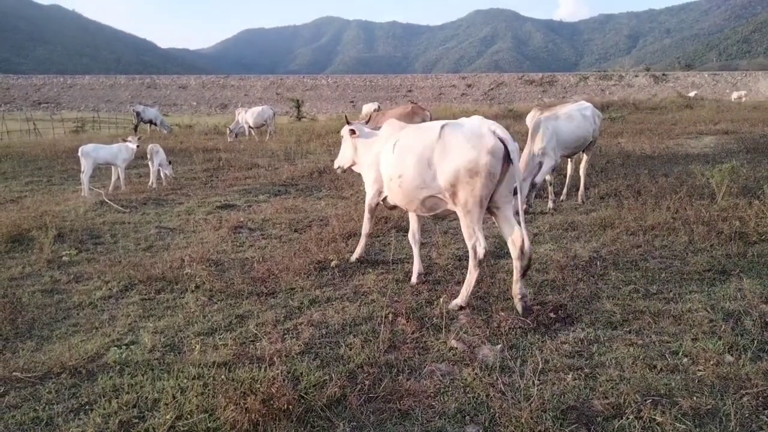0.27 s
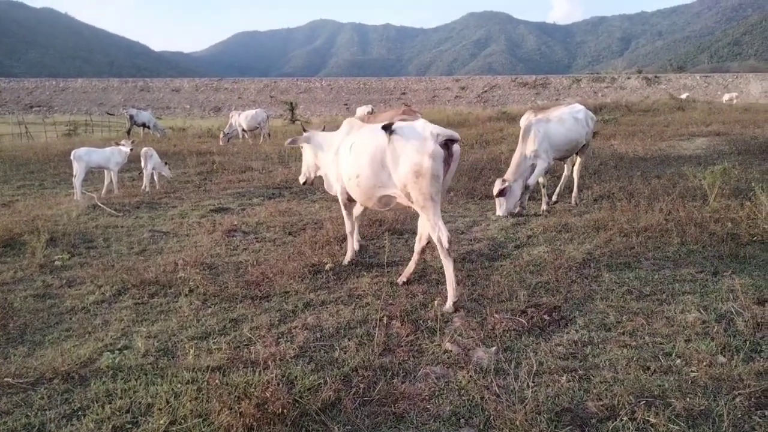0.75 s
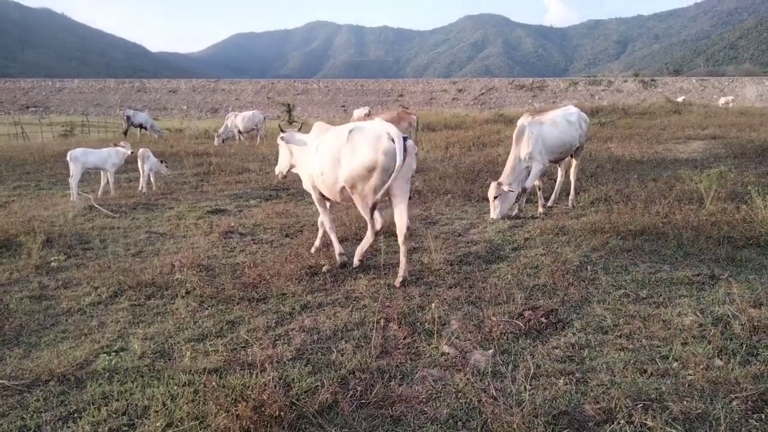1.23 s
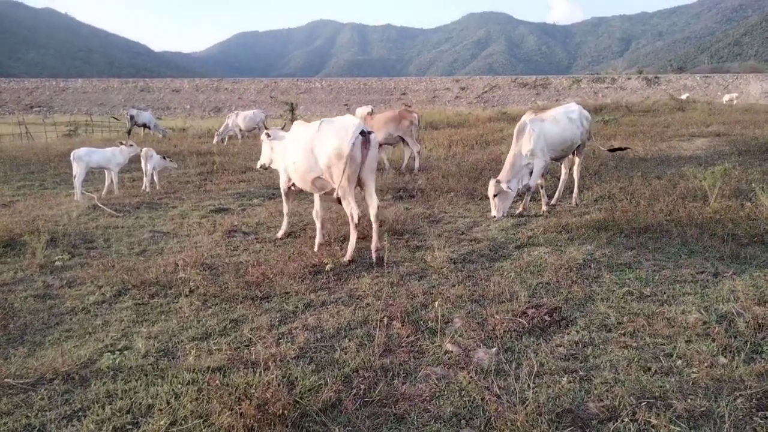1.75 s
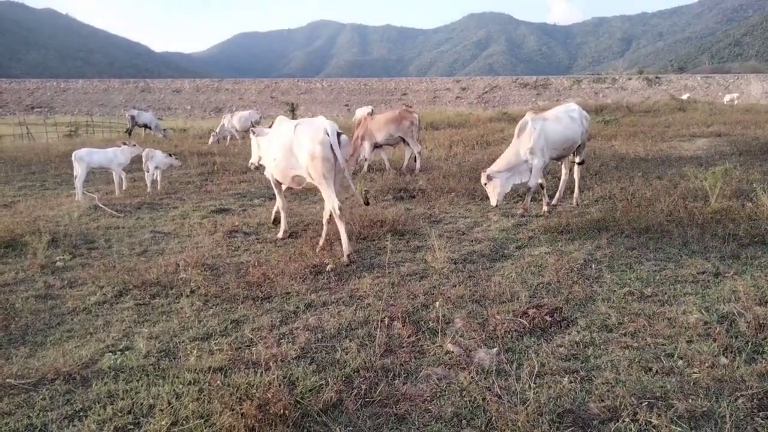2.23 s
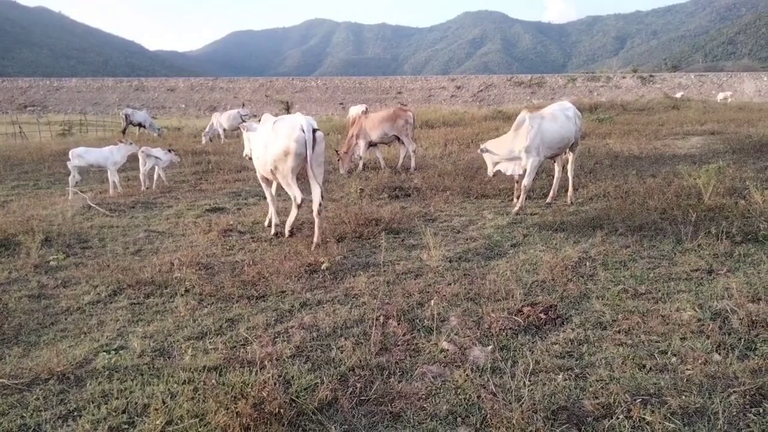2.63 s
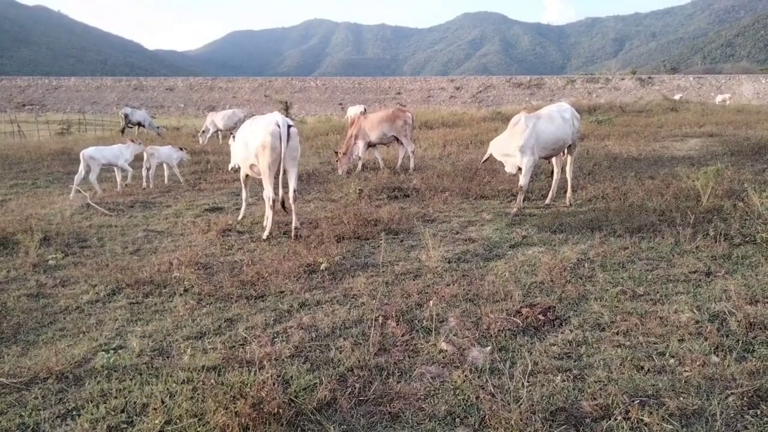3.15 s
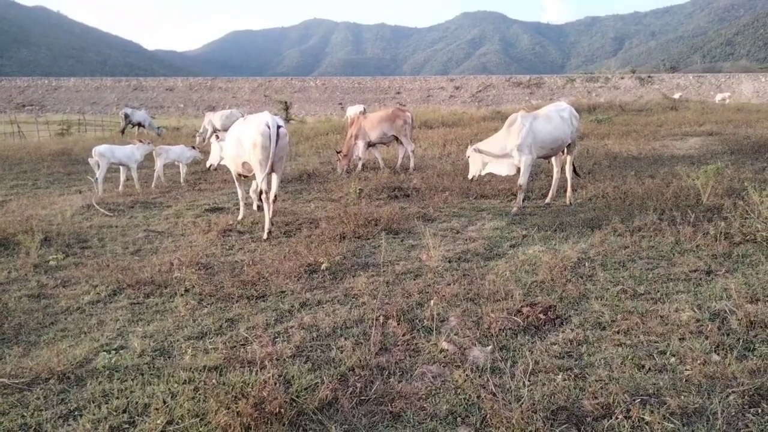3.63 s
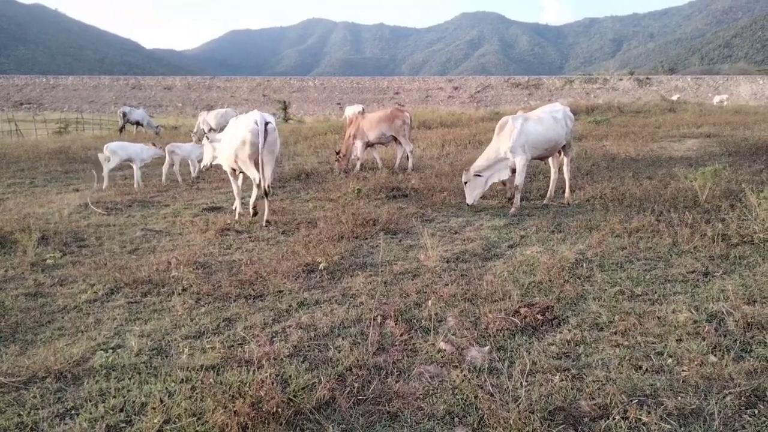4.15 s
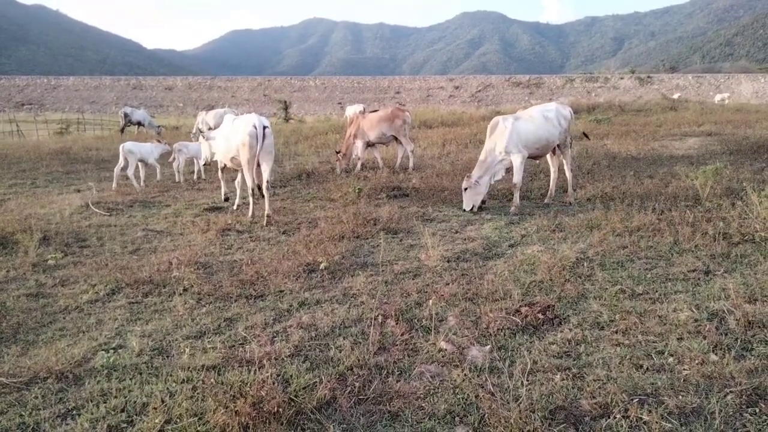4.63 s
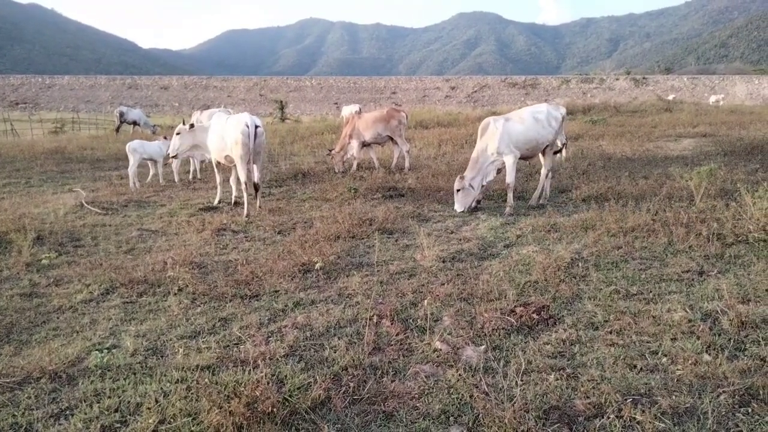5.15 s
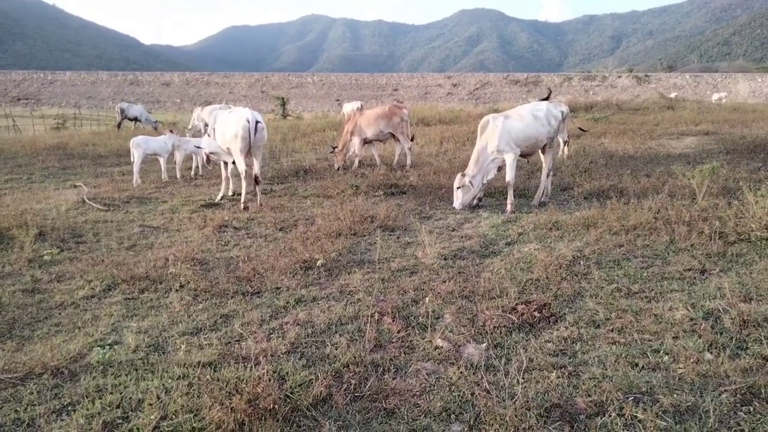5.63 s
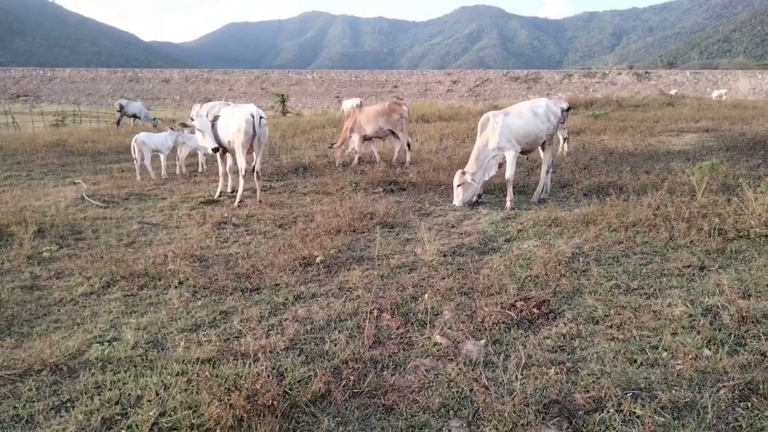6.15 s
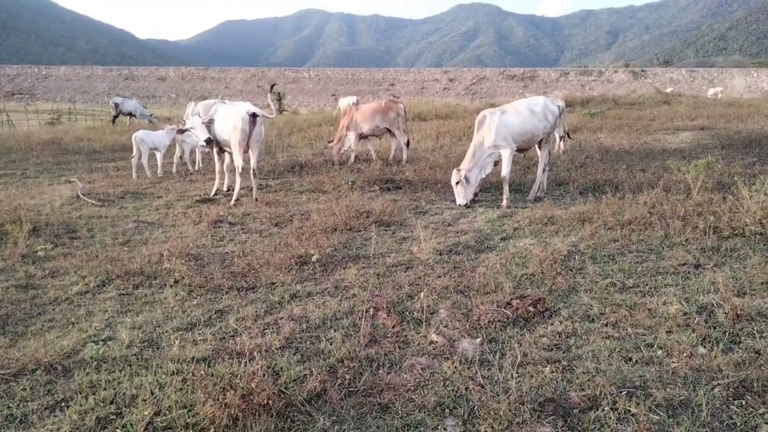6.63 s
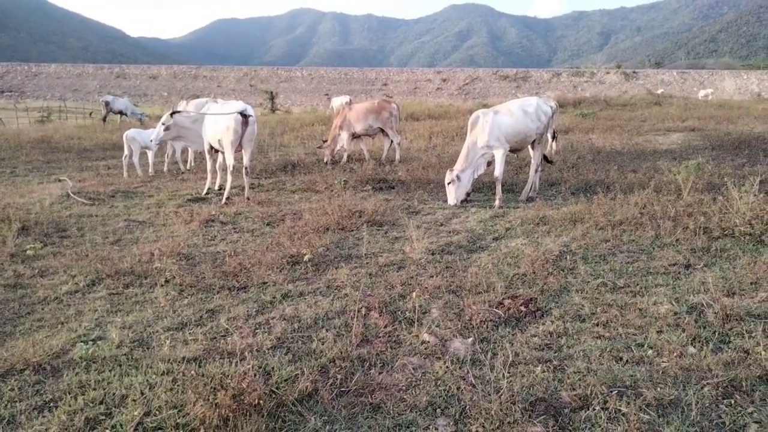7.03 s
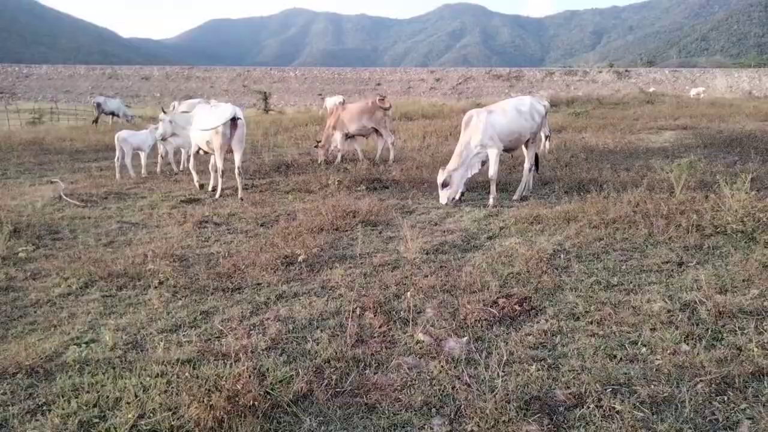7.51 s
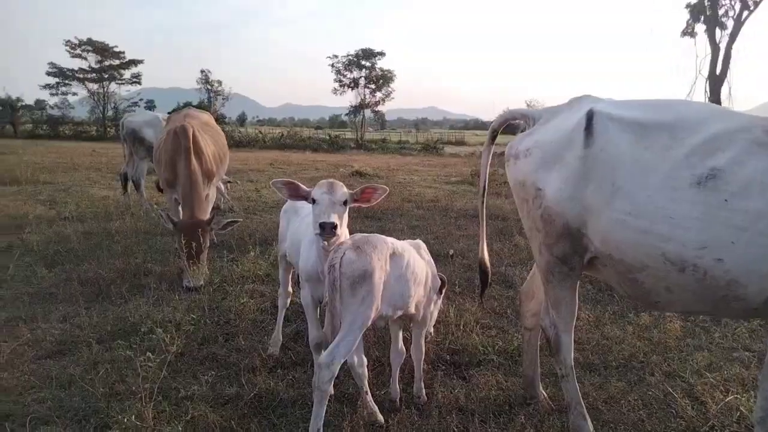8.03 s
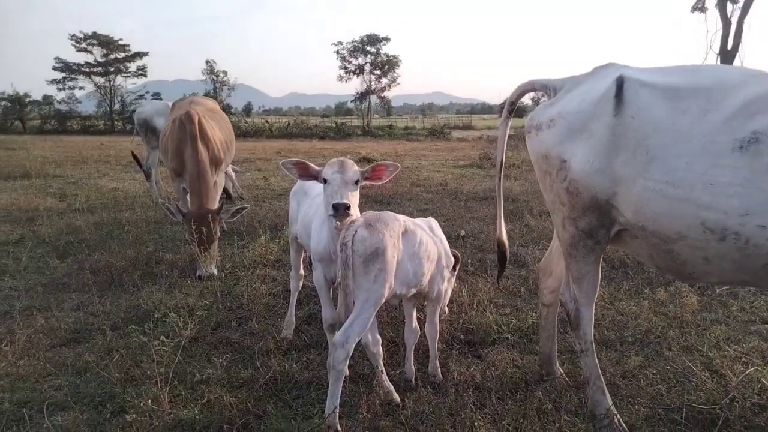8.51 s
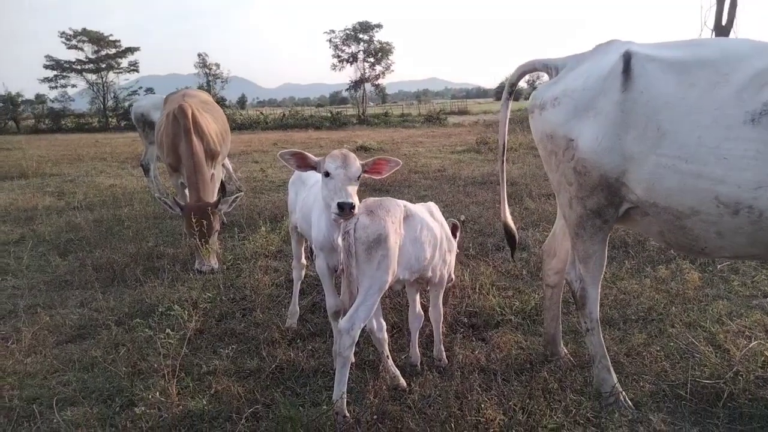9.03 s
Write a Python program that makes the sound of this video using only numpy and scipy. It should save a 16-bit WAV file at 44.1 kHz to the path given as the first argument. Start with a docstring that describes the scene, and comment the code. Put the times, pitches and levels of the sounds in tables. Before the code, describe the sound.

Hollow handle knocks, creaks and tiny metal jingles over a quiet pasture with buzzing insect and chipping birds, then closer clunks, rustling grass and rumble.

```python
"""A dry pasture where cattle graze, heard from a hand-held camera with a hollow handle. Close by, the handle
knocks and creaks as ringing modes, a small metal fitting jingles and dry stalks snap. Behind, an animal calls
once with a rasp in its throat, an insect buzzes in stroke-by-stroke noise, small birds chip and whistle in
gliding tones, and a far engine drones. The sound drops out briefly as the scene changes to a nearer view:
rustling grass made of tiny cracks, heavier clunks and a low rumble of handling."""
import sys
import numpy as np
from scipy import signal
from scipy.fft import rfft, irfft, next_fast_len
from scipy.io import wavfile
from scipy.ndimage import uniform_filter1d

SR = 44100
rng = np.random.default_rng(int(sys.argv[2]) if len(sys.argv) > 2 else 0)


def generate_wav(signal):
    """Clip the signal to [-1, 1] and save it as 16-bit WAV at the path in sys.argv[1]."""
    frames = np.transpose(np.atleast_2d(signal))
    scaled = np.clip(frames, -1, 1) * 32767
    pcm = np.round(scaled).astype(np.int16)
    wavfile.write(sys.argv[1], SR, pcm)


N = 408807
TIME = np.arange(N) / SR  # s

# Ringing modes of the hollow handle: (frequency [Hz], relative level [dB], t60 [s])
HANDLE_MODES = [(628, -10, 0.1), (673.5, 0.5, 0.054), (753.6, 0, 0.047), (807, -6.5, 0.18),
                (1162, -13, 0.37), (1263, 0, 0.045), (1966, -8, 0.057), (2234, -9, 0.056),
                (2358, 4.5, 0.024), (3150, 14, 0.0059), (3650, 2.5, 0.011), (4670, -2, 0.01),
                (5780, 7, 0.0029), (8000, -15, 0.0063)]
# Ringing modes of the grip: (frequency [Hz], relative level [dB], t60 [s])
GRIP_MODES = [(367.2, 3, 0.26), (576, -4, 0.06), (767, 5, 0.085), (818, -2, 0.15), (1210, -22, 0.019),
              (1620, -16, 0.071)]
# The silence before the nearer part: (start [s], end [s])
SILENCE = (7.888, 8.02)


def amp(db):
    """Decibels to gain."""
    return 10 ** (np.asarray(db) / 20)


def rms_one(x):
    """Scale to rms 1."""
    return x / np.sqrt(np.mean(x ** 2) + 1e-20)


def peak_one(x):
    """Scale to peak 1."""
    return x / np.abs(x).max()


def add(out, s, sound):
    """Mix a sound in at a time in seconds."""
    at = max(int(s * SR), 0)
    out[at:at + len(sound)] += sound[:max(N - at, 0)]


def curve(rows):
    """Join rows of (time [s], value) by straight lines."""
    return np.interp(TIME, *np.transpose(rows))


def drift(per_s):
    """Normal random values about zero, `per_s` new ones a second, joined by straight lines."""
    return np.interp(TIME * per_s, np.arange(4096), rng.standard_normal(4096))


def filtered(x, kind, hz, order=2):
    """Causal Butterworth filter."""
    sos = signal.butter(order, np.clip(hz, 10, .45 * SR), kind, fs=SR, output="sos")
    return signal.sosfilt(sos, x)


def coloured(x, colour):
    """Shape a signal by (frequency [Hz], level [dB]) rows, falling away beyond their ends; rms 1."""
    hz, db = np.transpose(colour)
    size = next_fast_len(N)
    f = np.maximum(np.arange(size // 2 + 1) * SR / size, 1)
    skirts = np.minimum(f / hz[0], 1) ** 2 * np.minimum(hz[-1] / f, 1) ** 2
    gain = skirts * amp(np.interp(np.log(f), np.log(hz), db))
    return rms_one(irfft(rfft(x, size) * gain, size)[:N])


def noise(colour):
    """Steady noise of a given spectrum."""
    return coloured(rng.standard_normal(N), colour)


def ringing(modes):
    """One decaying sine per mode, as rows half a second long."""
    hz, db, t60 = np.transpose(modes)[:, :, None]
    t = TIME[:SR // 2]
    return amp(db - 60 * t / t60) * np.sin(2 * np.pi * hz * t)


def burst(t60):
    """A rough contact: noise that dies away exponentially."""
    t = TIME[:SR // 20]
    return rng.standard_normal(len(t)) * np.exp(-np.log(1000) * t / t60)


def slip(body, t60=0.033, low_hz=1200, crack=0.38, crumble=0.36, crumble_t60=0.075):
    """A hard little contact, crumbling away, excites the modes of a body and cracks on its own."""
    crumbs = burst(crumble_t60) * np.abs(rng.standard_normal(SR // 20))
    contact = filtered(burst(t60) + crumble * crumbs, "high", low_hz, order=1)
    out = peak_one(signal.fftconvolve(body, contact))
    add(out, 0, crack * peak_one(filtered(contact, "band", (2200, 7500))))
    return out


def handle(thud_db=1.0, scatter_db=5.0, thud_low_hz=560, thud_high_hz=880,
           grit_db=0.5, grit_low_hz=1500, grit_high_hz=3800, grit_gap_s=0.0098, grit_loss_db=8.5,
           hum_db=-36, rebound_s=0.062, rebound_db=-16):
    """A knock wakes the low cavity modes and a faint grip hum; grit in the joint crunches in a dying run."""
    # Knocks, before the gains above: (time [s], thud level [dB], grit level [dB])
    knocks = [(0.103, -44.5, -50), (0.256, -50.5, -52.5), (0.393, -48, -59), (0.657, -52.5, -56),
              (0.756, -56.5, -54), (1.015, -41, -43), (1.271, -45.5, -58.5), (1.597, -41, -46),
              (1.768, -44.5, -55), (2.135, -47, -60.5), (2.163, -59.5, -65.5), (2.484, -45.5, -56),
              (2.915, -48, -57), (3.306, -48.5, -55), (3.359, -60.5, -70), (3.718, -48.5, -52.5),
              (4.009, -53, -73), (4.382, -48.5, -55), (4.812, -43, -46.5), (5.21, -50, -60),
              (5.475, -59, -70), (5.88, -48.5, -48.5), (7.243, -49.5, -58.5), (7.273, -54.5, -62),
              (7.677, -46, -54.5), (8.344, -48.5, -59.5), (8.517, -41, -48), (8.58, -54, -48.5),
              (9.118, -42.5, -42.5)]
    out, rings, hum = np.zeros(N), ringing(HANDLE_MODES), ringing(GRIP_MODES)[0]
    for s, db, crunch_db in knocks:
        body = amp(rng.normal(0, scatter_db, len(rings))) @ rings
        cavity = filtered(filtered(body, "high", thud_low_hz, order=8), "low", thud_high_hz, order=4)
        thud = amp(db + thud_db) * peak_one(cavity)
        add(out, s, thud + amp(db + hum_db) * hum)
        # The handle settles with a second, weaker touch, random in time and force
        rebound = amp(rebound_db) * 2 * rng.random() ** 2
        add(out, s + rebound_s * (.5 + rng.random()), rebound * thud)
        for k, after in enumerate(np.cumsum(grit_gap_s * (0.44 + rng.random(size=4)))):
            shell = amp(rng.normal(0, scatter_db, len(rings))) @ rings
            crunch = filtered(slip(shell), "band", (grit_low_hz, grit_high_hz), order=1)
            delay = (k > 0) * (after - grit_gap_s / 2)  # the first grain falls on the knock
            add(out, s + delay, amp(crunch_db + grit_db - k * grit_loss_db) * crunch)
    return out


def joint(level_db=2.0, slip_gap_s=0.011, max_loss_db=6):
    """A creak is one slip or an uneven run of slips in the handle's shell, the first the strongest."""
    # Creaks, before the gain above: (time [s], length [s], level [dB])
    creaks = [(0.254, .005, -48), (0.982, .015, -52.5), (1.189, .005, -44.5), (1.415, .005, -52),
              (2.438, .03, -60), (2.594, .018, -57), (2.648, .005, -55.5), (3.084, .015, -60.5),
              (3.239, .005, -56), (3.291, .005, -52), (3.423, .028, -57.5), (3.668, .028, -56),
              (3.716, .014, -52.5), (4.0897, .014, -50), (4.134, .018, -47.5), (4.606, .005, -56.5),
              (5.617, .014, -46.5), (5.741, .005, -57.5), (5.965, .014, -52), (5.989, .005, -58),
              (6.009, .005, -52), (6.054, .005, -48.5), (6.107, .005, -58.5), (6.397, .005, -60),
              (6.609, .045, -51), (6.882, .005, -53.5), (7.053, .005, -56.5), (7.088, .005, -51.5),
              (7.567, .045, -57.5), (8.513, .025, -42.5), (8.652, .02, -44.5), (9.0265, .005, -49.5),
              (9.077, .005, -48.5)]
    out, shell = np.zeros(N), ringing(HANDLE_MODES).sum(0)
    for s, length, db in creaks:
        after, loss_db = 0, 0
        for spacing, weakening in rng.random(size=(7, 2)):
            sounding = after < length
            add(out, s + after, sounding * amp(db + level_db - loss_db) * slip(shell))
            after += slip_gap_s * (.7 + .6 * spacing)
            loss_db = max_loss_db * weakening
    return out


def fitting(gain_db=1.0, bounce=0.49, bounce_s=0.01, tick_db=3.5, tick_t60=0.044, tick_low_hz=5000,
            chord_under_db=6, roll_s=0.00096, tilt_pivot_hz=7000, scatter_db=2.5, favour_step_db=3.2):
    """Each touch ticks, favours three metal modes over a fainter chord of the rest, then bounces once."""
    # Touches, before the gains above: (time [s], leading, second and third mode [Hz], leading level [dB],
    # level of the other modes [dB], their brightness [dB/octave], contact tick level [dB])
    touches = [(.061,6173,5067,9953,-53.5,-60,3,-59), (0.1908,9243,8881,6173,-38.5,-54.5,-0.5,-38),
               (0.365,8690,5475,8881,-43,-51.5,.5,-54), (0.5906,10906,9243,6173,-48.5,-61.5,-1,-56),
               (.638,9767,5475,7805,-52.5,-64,2,-55), (.672,9767,6173,8881,-51.5,-61,0,-64),
               (0.7361,9243,8881,9767,-47.5,-55.5,1.5,-59), (.95,8881,6173,6341,-57.5,-64,1,-53.5),
               (1.154,10906,8403,6341,-50,-53.5,-1,-54), (1.359,8881,9243,6173,-55.5,-61,3,-55.5),
               (1.919,10906,9243,6173,-52,-63,1,-57.5), (3.0253,8403,6173,6341,-47.5,-55,-1,-46),
               (3.236,6173,8881,7805,-63.5,-65.5,3,-62), (3.436,6341,8881,8690,-55,-65,-4.5,-52.5),
               (3.718,6173,5067,8690,-65,-70,-1,-61), (3.906,7030,8403,3612,-53.5,-64.5,-1,-48),
               (4.193,8881,6341,9609,-61.5,-72,-1,-59), (4.4393,8881,2906,6341,-50.5,-54,4.5,-51.5),
               (4.852,6173,8881,2906,-60,-67.5,-1,-57), (5.241,8690,7030,6341,-61,-66.5,-0.5,-68),
               (6.223,6173,6341,3746,-64,-68.5,-2,-69), (6.65,7030,6173,8881,-66,-75,-2,-68),
               (6.801,10906,8881,6173,-61,-71,-3.5,-67), (6.926,6173,8881,5200,-58.5,-65,0,-62),
               (7.1838,6173,8881,6341,-58.5,-70,-4.5,-64), (7.488,6341,8690,6173,-58,-70,-3,-63),
               (7.7223,6341,5200,9243,-58,-67.5,-5.5,-61), (8.0216,9243,6341,3892,-61.5,-66.5,-3.5,-63),
               (8.543,8881,3892,2906,-52,-61.5,5,-54), (9.231,8690,6341,6173,-40.5,-46.5,1.5,-40)]
    # Ringing modes of the metal: (frequency [Hz], relative level [dB], t60 [s])
    metal_modes = [(2422, -18, 0.3), (2906, -10, 0.42), (3612, -13, 0.22), (3746, -13, 0.3),
                   (3892, -17, 0.24), (4080, -14, 0.26), (5067, -9, 0.26), (5200, -11, 0.32),
                   (5475, -9, 0.2), (6173, -4, 0.25), (6341, -8, 0.28), (7030, -10, 0.12), (7805, -9, 0.22),
                   (8403, -6, 0.17), (8690, -1, 0.14), (8881, 0, 0.16), (9243, -5, 0.15), (9609, -4, 0.17),
                   (9767, -3, 0.12), (9953, -3, 0.16), (10906, -4, 0.12), (10992, -4, 0.13),
                   (12545, -11, 0.11), (13011, -5, 0.12), (13690, -8, 0.14), (14448, -12, 0.12),
                   (14820, -9, 0.11), (15433, -11, 0.11)]
    hz, mode_db, t60 = np.transpose(metal_modes)
    out = np.zeros(N)
    rings = ringing(metal_modes) / amp(mode_db)[:, None]  # all modes equal; each touch sets their levels
    roll = np.minimum(TIME[:rings.shape[1]] / roll_s, 1)  # the contact rolls, so the ring builds up
    for s, *favoured_hz, lead_db, rest_db, brightness, contact_db in touches:
        tilt_db = brightness * np.log2(hz / tilt_pivot_hz)
        chord_db = rest_db + mode_db + tilt_db + rng.normal(0, scatter_db, len(hz))
        db = np.minimum(chord_db, lead_db - chord_under_db)
        for rank, favoured in enumerate(favoured_hz):
            db[np.argmin(abs(hz - favoured))] = lead_db - rank * favour_step_db
        for after, force in ((0, 1), (bounce_s * (.5 + rng.random()), bounce)):
            signs = rng.choice([-1, 1], len(hz))
            add(out, s + after, force * roll * ((amp(db + gain_db) * signs) @ rings))
        tick = filtered(burst(tick_t60), "band", (tick_low_hz, 14000), order=1)
        add(out, s, amp(contact_db + tick_db) * tick)
    return out


def clunks(level_db=1.5, click_db=-5.5, scatter_db=3.0):
    """Heavier blows ring the grip's modes and rattle the handle's shell."""
    # Blows, before the gains above: (time [s], level [dB])
    blows = [(8.062, -58), (8.117, -50), (8.226, -47), (8.2662, -36), (8.642, -48), (8.654, -40.5),
             (8.7282, -33.5), (9.03, -47), (9.079, -54.5)]
    out, rings, shell = np.zeros(N), ringing(GRIP_MODES), ringing(HANDLE_MODES).sum(0)
    for s, db in blows:
        body = amp(rng.normal(0, scatter_db, len(rings))) @ rings
        add(out, s, amp(db + level_db) * peak_one(filtered(body, "high", 420)))
        add(out, s, amp(db + click_db) * slip(shell))
    return out


def stalks(level_db=5.5, t60=0.026, band_hz=(7500, 11000), body_db=-10.5):
    """A dry stalk breaks with a short bright crack of noise over a fainter, wider body."""
    # Snaps, before the gain above: (time [s], level [dB])
    snaps = [(0.776, -46.5), (2.6655, -47), (4.368, -48), (7.0213, -57), (8.194, -49.5), (8.225, -42),
             (8.234, -45.5), (8.2654, -36), (8.6402, -44), (8.664, -41), (8.728, -42.5)]
    out = np.zeros(N)
    for s, db in snaps:
        crack = burst(t60)
        snap = filtered(crack, "band", band_hz) + amp(body_db) * filtered(crack, "high", 2600)
        add(out, s, amp(db + level_db) * peak_one(snap))
    return out


def handling(bump_db=-2.0, cycles=0.73, sway_db=-38.5, fade_in_s=.06):
    """The hand bumps the camera in swells of a cycle or two; a low rumble joins after the silence."""
    # Bumps, before the gain above: (time of the middle [s], level [dB], frequency [Hz])
    bumps = [(5.724, -57, 230), (8.531, -39, 59), (8.542, -36, 140), (8.599, -35.5, 94), (8.643, -41, 55.4),
             (8.78, -47, 133), (8.839, -43.5, 46.5), (9.05, -39.5, 48), (9.09, -42, 92), (9.19, -30, 60),
             (9.188, -37, 173)]
    # Spectrum of the rumble: (frequency [Hz], relative level [dB])
    sway_colour = [(4, 0), (9, -20.5), (25, -35), (60, -39.5), (150, -52), (400, -60)]
    fade_in = np.clip((TIME - SILENCE[1]) / fade_in_s, 0, 1) ** 2
    out = amp(sway_db) * noise(sway_colour) * fade_in
    t = TIME[:SR // 5]
    for s, db, hz in bumps:
        turn = hz * (t - t.mean())
        bump = np.exp(-(turn / cycles) ** 2) * np.sin(2 * np.pi * turn)
        add(out, s - t.mean(), -amp(db + bump_db) * peak_one(bump))
    return out


def grass(grains_per_s, size_db, smooth):
    """Countless tiny cracks of dry blades, in clumps, over a smooth hiss."""
    born = rng.random(N) < grains_per_s * amp(4 * drift(25)) / SR
    size = amp(size_db * np.minimum(rng.exponential(1, N), 6))
    grains = born * rng.choice([-1, 1], N) * size
    return rms_one(grains) + smooth * rng.standard_normal(N)


def crackle(per_s=420, size_db=-0.5, cycles=18, smooth=0.61):
    """Crushed stems: each tiny break rings briefly at a pitch of its own, over a smooth hiss."""
    out, t = np.zeros(N), TIME[:SR // 40]
    count = int(np.clip(per_s, 50, 2000) * TIME[-1])
    for when, pitch, size in rng.random((count, 3)):
        turn = 600 * 9 ** pitch * t  # 600 to 5400 Hz
        grain = np.sin(2 * np.pi * turn) * np.exp(-np.log(1000) * turn / cycles)
        add(out, when * TIME[-1], amp(size_db * min(-np.log(size), 4)) * grain)
    return rms_one(out) + smooth * rng.standard_normal(N)


def rustle(far_db=9.0, near_fine_db=-66, near_coarse_db=-75, crunch_db=-5, fade_in_s=0.03,
           attack_s=0.019, release_s=0.077):
    """Fine rustle across the pasture; each scuff swells quickly, dies away and also crunches lower down."""
    # Fine rustle before the silence, without far_db: (time [s], level [dB])
    far_level = [(0.0, -76), (2.03, -83.5), (3.77, -84), (3.85, -80.5), (5.1, -83.5), (5.37, -86.5),
                 (7.6, -86.5)]
    # Scuffs in the grass: (time of the peak [s], coarse level before crunch_db [dB], fine level [dB])
    scuffs = [(.25, -67.5, -73), (1.03, -68.5, -84), (1.61, -65.5, -81), (2.84, -92, -79),
              (7.809, -69.5, -68.5), (8.225, -53.5, -52.5), (8.527, -59, -74), (8.66, -52.5, -79),
              (8.76, -55.5, -78), (9.04, -58.5, -79)]
    # Spectrum of the fine rustle: (frequency [Hz], relative level [dB])
    fine_colour = [(1500, -9.5), (4000, -13.5), (6500, -10.5), (9000, 1.5), (11000, -6), (12500, -9),
                   (15500, -6.5)]
    close = np.clip((TIME - SILENCE[1]) / fade_in_s, 0, 1)
    fine = np.where(TIME < SILENCE[1], amp(curve(far_level) + far_db), close * amp(near_fine_db))
    coarse = close * amp(near_coarse_db)
    for s, coarse_db, fine_db in scuffs:
        swell = np.exp(-np.maximum((s - TIME) / attack_s, (TIME - s) / release_s))
        fine = np.hypot(fine, amp(fine_db) * swell)
        coarse = np.hypot(coarse, amp(coarse_db) * swell)
    blades = coloured(grass(grains_per_s=6100, size_db=3.5, smooth=0.51), fine_colour)
    crunch = coloured(crackle(), [(450, 8.0), (800, 4.5), (1200, 2.5), (2700, 2.5), (5000, 6.5)])
    return fine * blades + amp(crunch_db) * coarse * crunch


def animal(top_hz=243, sag_hz=3, jitter=0.0402, pulse_db=-2, shake_db=2.5):
    """One hoarse call: rasp and uneven pulses ring in a throat; pitch and level arch, and the level shakes."""
    # The call: (time of its peak [s], attack [s], release [s], level [dB])
    call = (0.868, 0.02, 0.036, -56.5)
    # Spectrum of the throat: (frequency [Hz], relative level [dB])
    throat = [(480, -8.5), (720, -0.5), (980, 0.5), (1300, -11.5), (1700, 4), (1900, -25), (2600, -21),
              (3300, -15), (4000, -37)]
    peak_s, attack_s, release_s, db = call
    away = np.minimum(np.maximum((peak_s - TIME) / attack_s, (TIME - peak_s) / release_s), 20)
    pitch = (top_hz - sag_hz * np.minimum(away ** 2, 20)) * (1 + jitter * drift(300))
    cycles = np.cumsum(pitch) / SR
    pulses = rms_one(np.diff(np.floor(cycles), prepend=0))
    rasp = rms_one(rng.standard_normal(N) * (1 - .5 * (cycles % 1)))  # weakens through each cycle
    voice = coloured(filtered(amp(pulse_db) * pulses + rasp, "high", 270, order=4), throat)
    return amp(db + shake_db * drift(70.6)) / np.cosh(away) * voice


def insect(far_db=-75.5, near_db=-62.5, between_db=-87.5, half_phrase_s=0.21,
           strokes_per_s=160, pitch_hz=7980, fall_hz=600, width_hz=300):
    """Every wing stroke is a short rasp falling in pitch; the song swells in phrases, louder when nearer."""
    # Middles of the phrases: time [s]
    phrases = [.1, .92, 1.52, 2.25, 2.95, 3.8, 4.45, 5.28, 6.1, 6.92, 7.72, 8.7]
    stroke = np.cumsum(strokes_per_s * (1 + 0.043 * drift(10.0))) / SR % 1
    phase = 2 * np.pi * np.cumsum(pitch_hz + fall_hz * (.5 - stroke)) / SR
    # Slow noise on two carriers a quarter cycle apart makes a narrow band of noise at the pitch
    rasp = filtered(rng.standard_normal((2, N)), "low", width_hz)
    band = rasp[0] * np.cos(phase) + rasp[1] * np.sin(phase)
    buzz = np.sqrt(np.sin(np.pi * stroke)) * band
    swell = sum(1 / (1 + ((TIME - s) / half_phrase_s) ** 4) for s in phrases)
    song = swell * amp(np.where(TIME < SILENCE[1], far_db, near_db))
    return np.hypot(song, amp(between_db)) * rms_one(buzz)


def bird(level_db=-8.5):
    """A run of nearly pure chips, all of one shape, each slightly detuned."""
    # Chips, before the gain above: (time [s], level [dB])
    chips = [(5.518, -51.5), (5.691, -48), (5.864, -45), (6.038, -45), (6.252, -59), (6.438, -57.5),
             (6.815, -54), (7.101, -55), (7.294, -50.5)]
    # One chip, a flick and an upward slur: (time from its start [s], nominal pitch [Hz], amplitude [0-1])
    chip_shape = [(0, 6700, 0), (.0015, 7700, .8), (.0035, 6700, 0), (.006, 6900, 0), (.0075, 7400, .8),
                  (.0095, 7150, 1), (.013, 7550, .9), (.0175, 8000, .25), (.02, 8100, 0)]
    out, (at, hz, height) = np.zeros(N), np.transpose(chip_shape)
    t = TIME[TIME < at[-1]]
    for s, db in chips:
        pitch = np.interp(t, at, hz) * (1 + 0.0028 * rng.standard_normal())
        tone = np.sin(2 * np.pi * np.cumsum(pitch) / SR)
        add(out, s, amp(db + level_db) * np.interp(t, at, height) * tone)
    return out


def glide(length, first_hz, last_hz, scatter_t60=0.058):
    """A thin tone that swells, slides and fades, blurred on its way across the field."""
    pitch = np.linspace(first_hz, last_hz, int(length * SR))
    tone = np.hanning(len(pitch)) * np.sin(2 * np.pi * np.cumsum(pitch) / SR)
    return peak_one(signal.fftconvolve(tone, burst(scatter_t60)))


def whines(peep_db=-63, peep_s=0.02, peep_first_hz=6150, peep_last_hz=5400):
    """Far birds whistle up and down in gliding tones; a nearer one gives falling peeps."""
    # Far whistles: (time [s], length before the blur [s], first pitch [Hz], last pitch [Hz], level [dB])
    whistles = [(1.413, 0.077, 2500, 3050, -72), (1.45, 0.13, 3030, 3300, -80),
                (1.596, 0.12, 2520, 3060, -81), (1.777, 0.13, 2550, 3180, -75),
                (2.094, 0.12, 2480, 2860, -81), (4.537, 0.064, 2880, 4030, -72),
                (4.56, 0.25, 2360, 1910, -76.5)]
    # Peeps in the nearer part: time [s]
    peeps = [8.358, 8.485, 8.85, 8.962, 9.075, 9.172]
    out = np.zeros(N)
    for s, length, first_hz, last_hz, db in whistles:
        add(out, s, amp(db) * glide(length, first_hz, last_hz))
    for s in peeps:
        add(out, s, amp(peep_db) * glide(peep_s, peep_first_hz, peep_last_hz))
    return out


def distance(air_db=-84.5, low_db=-73.0, engine_db=8.0, engine_hz=77, second_db=-13.0):
    """Open air and a low rumble as shaped noise; a far engine drones on two wavering harmonics."""
    # Far engine, before engine_db: (time [s], level [dB])
    engine_level = [(0, -87), (.45, -79), (1.4, -76.5), (2.1, -90.5), (3.6, -106), (3.8, -78), (4.4, -82.5),
                    (5.0, -96), (7.85, -82)]
    # Spectrum of the open air: (frequency [Hz], relative level [dB])
    air_colour = [(250, 1.5), (450, -17.5), (750, -1), (1500, -14), (3000, -10), (4500, -19.5),
                  (7000, -24.5)]
    # Spectrum of the low rumble: (frequency [Hz], relative level [dB])
    low_colour = [(20, -1.5), (45, -8), (85, 0), (130, -8), (170, -7), (220, -26.5), (330, -19),
                  (400, -26.5)]
    phase = 2 * np.pi * np.cumsum(engine_hz * (1 + 0.0821 * drift(12))) / SR
    harmonics = np.sin(phase) + amp(second_db) * np.sin(2 * phase)
    drone = rms_one(harmonics * amp(1.7 * drift(41)))
    air = amp(air_db) * noise(air_colour)
    rumble = amp(low_db) * noise(low_colour)
    return air + rumble + amp(curve(engine_level) + engine_db) * drone


def scene():
    """Near sounds over the pasture's background."""
    near = handle() + joint() + fitting() + clunks() + stalks() + handling() + rustle()
    background = animal() + insect() + bird() + whines() + distance()
    return (near + background)[None]


def record(dry, cutoff_hz=15800):
    """The sound stops briefly before the nearer part, with softened edges; the top is cut steeply."""
    sounding = 1.0 * ((TIME < SILENCE[0]) | (TIME > SILENCE[1]))
    running = uniform_filter1d(sounding, size=100)
    low_pass = signal.ellip(10, .2, 80, cutoff_hz, fs=SR, output="sos")
    return signal.sosfilt(low_pass, dry * running)


dry = scene()
out = record(dry)
generate_wav(out)
```